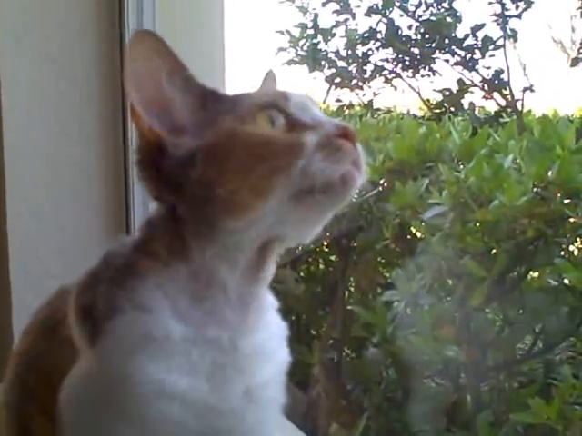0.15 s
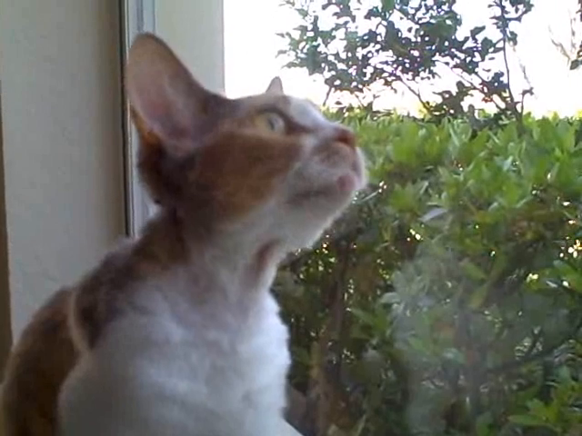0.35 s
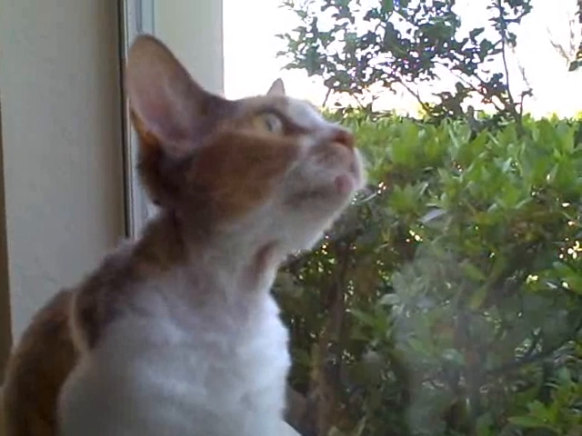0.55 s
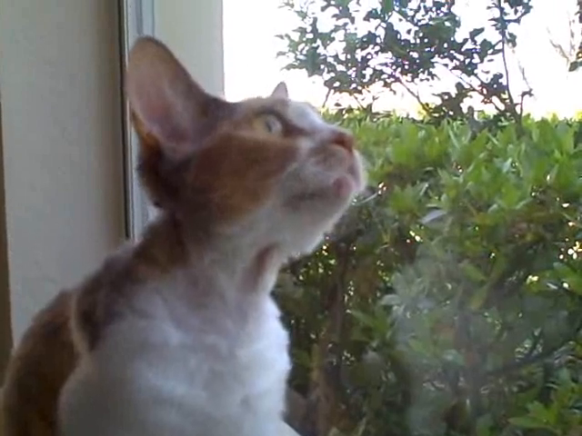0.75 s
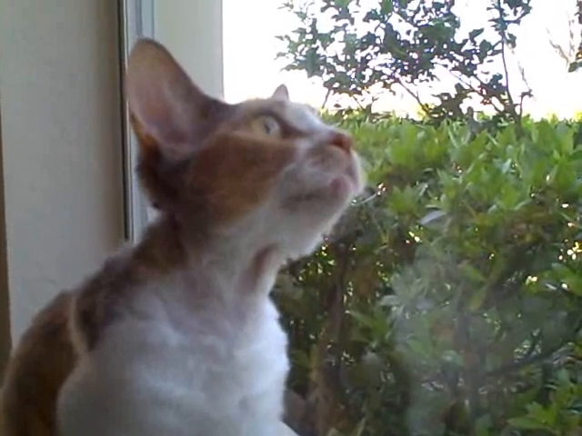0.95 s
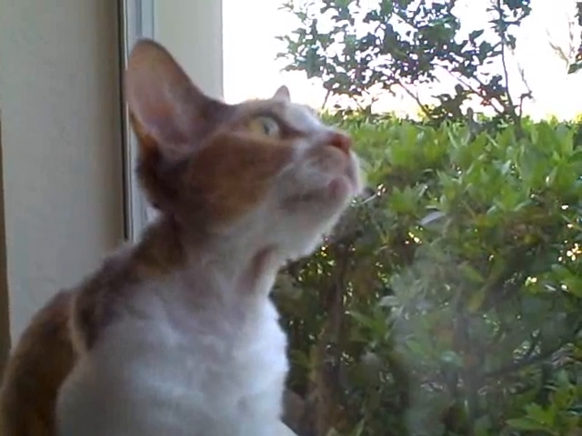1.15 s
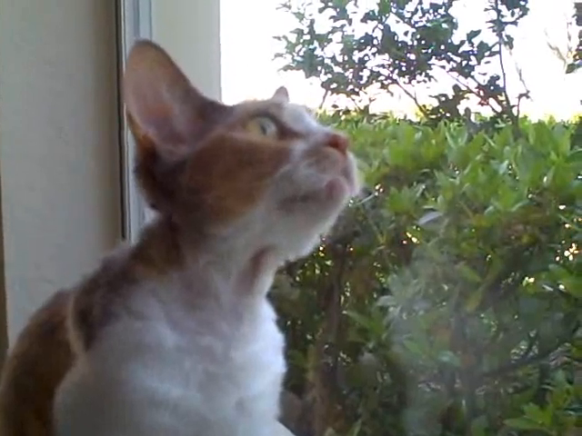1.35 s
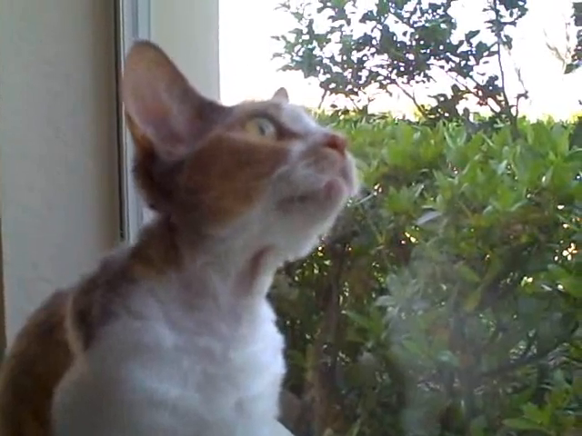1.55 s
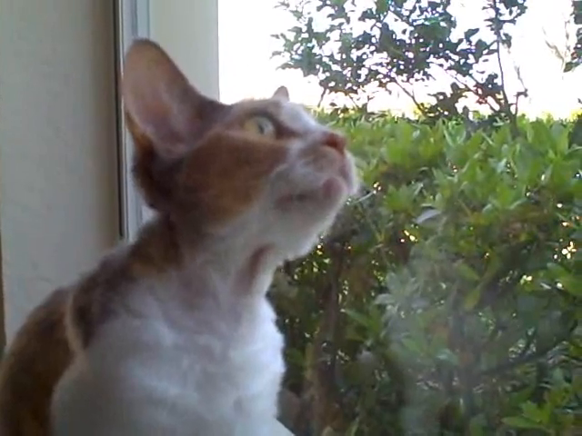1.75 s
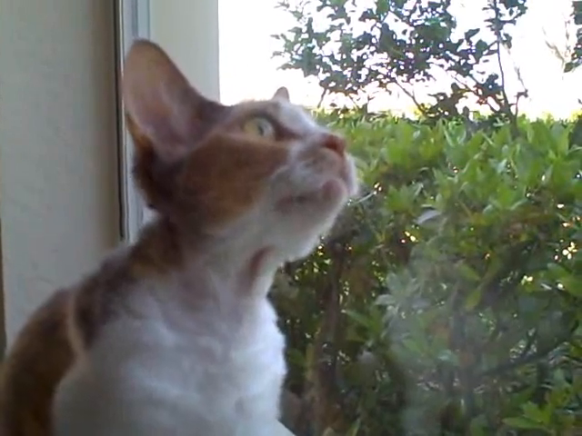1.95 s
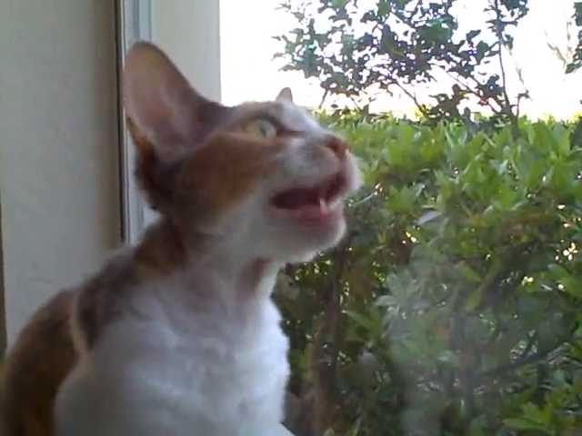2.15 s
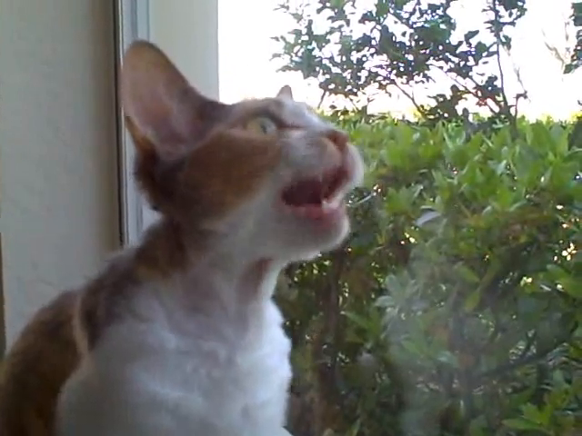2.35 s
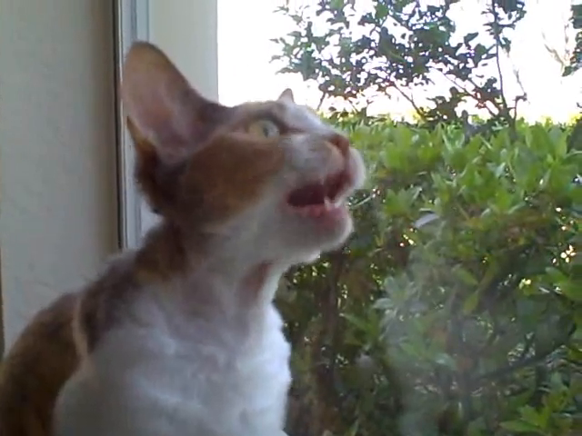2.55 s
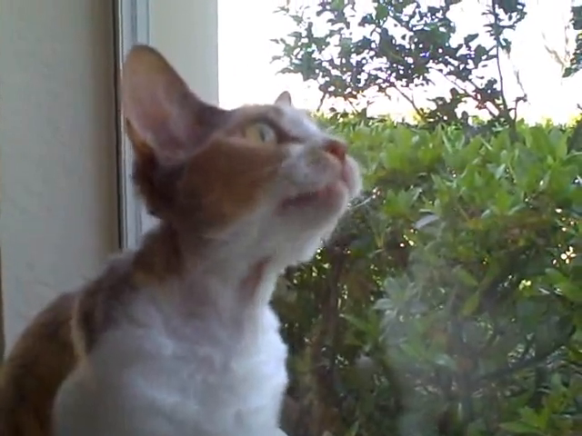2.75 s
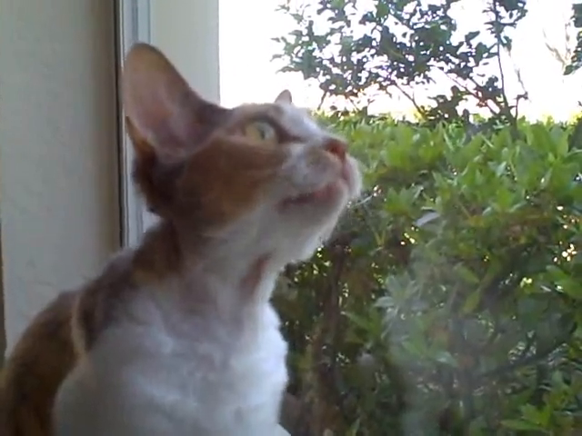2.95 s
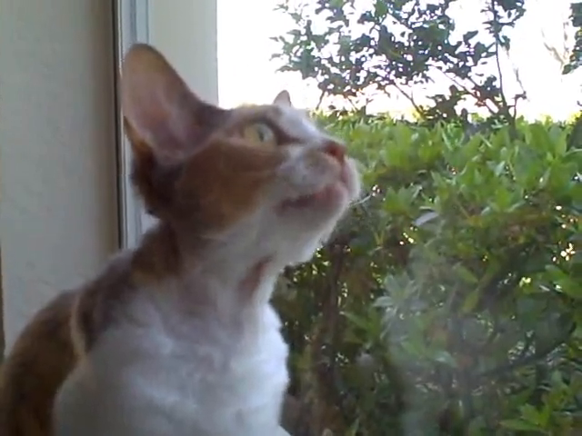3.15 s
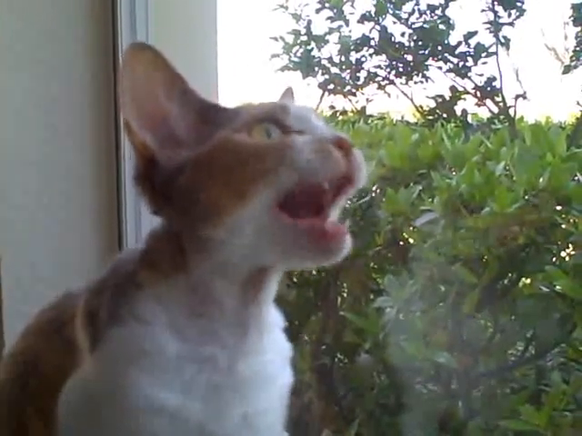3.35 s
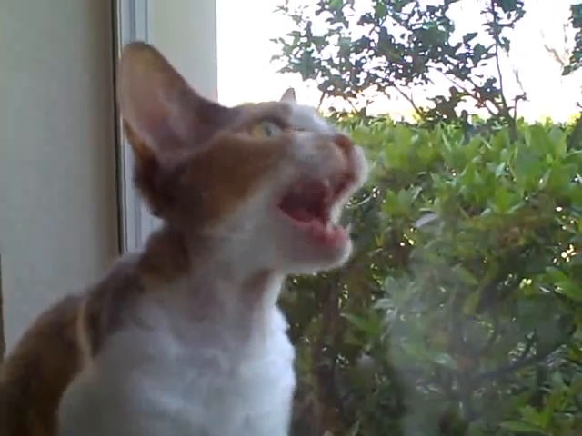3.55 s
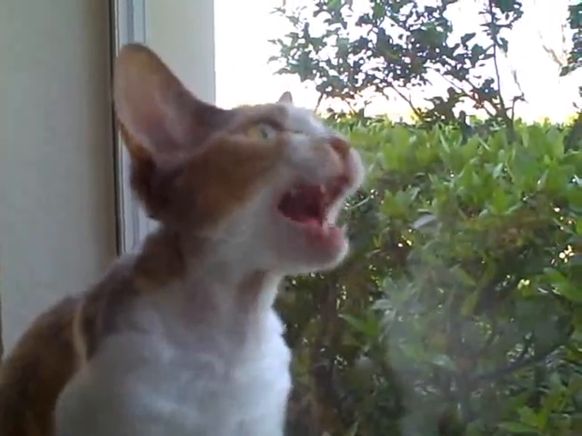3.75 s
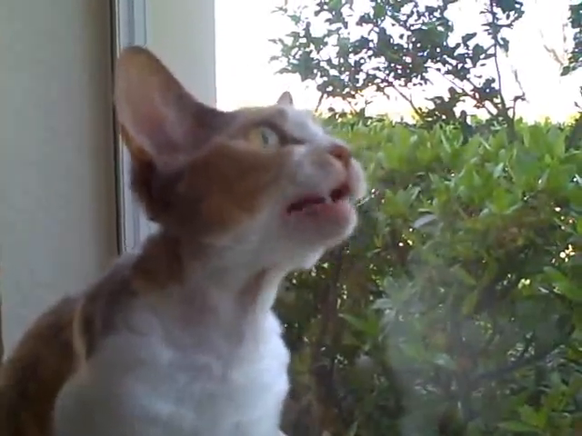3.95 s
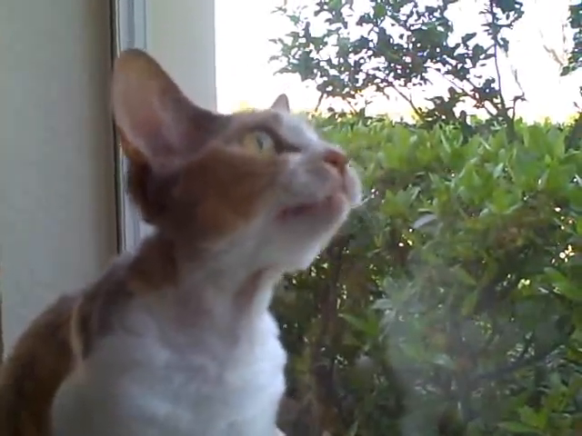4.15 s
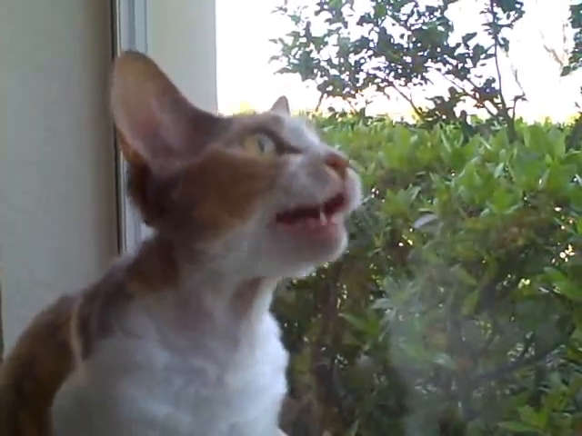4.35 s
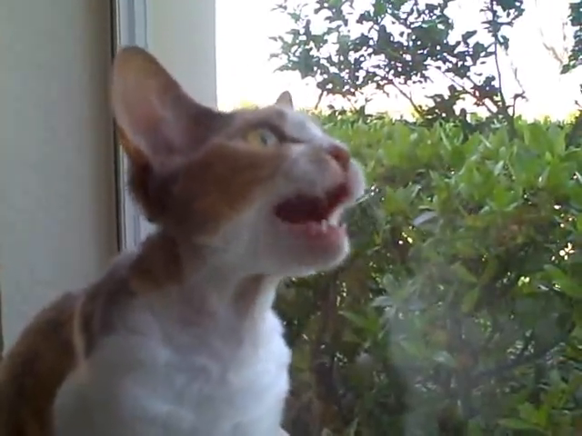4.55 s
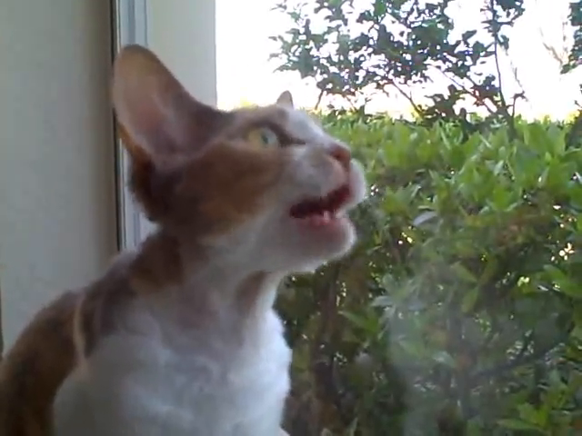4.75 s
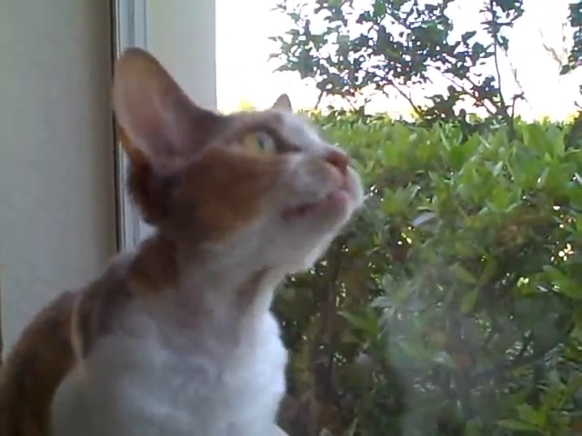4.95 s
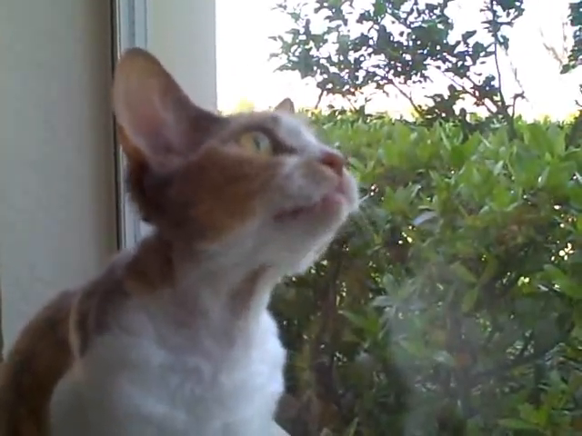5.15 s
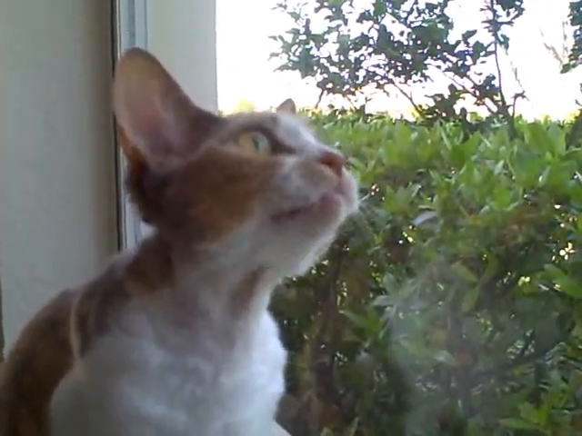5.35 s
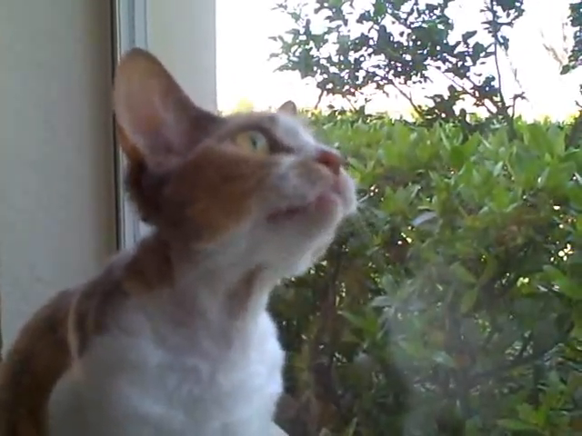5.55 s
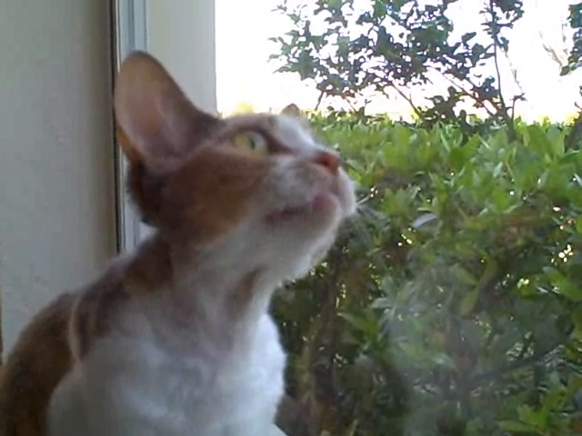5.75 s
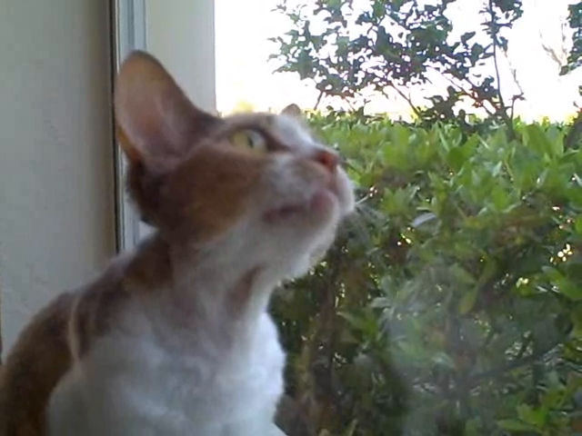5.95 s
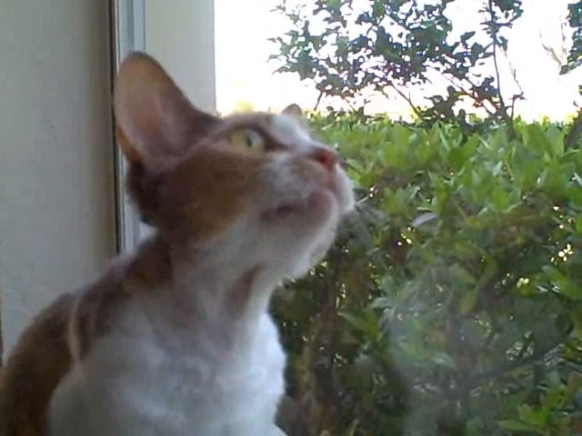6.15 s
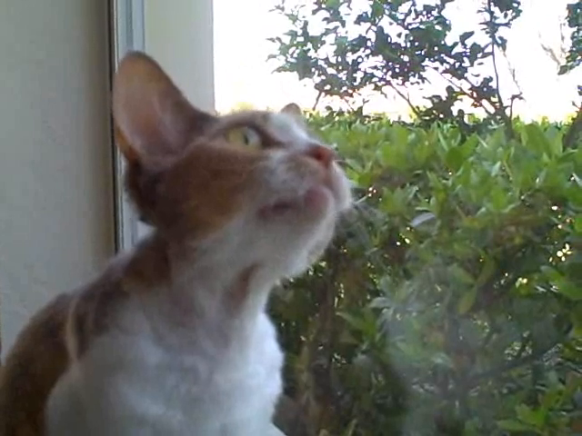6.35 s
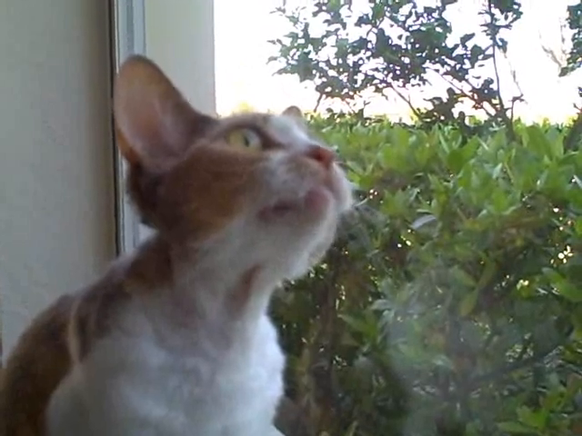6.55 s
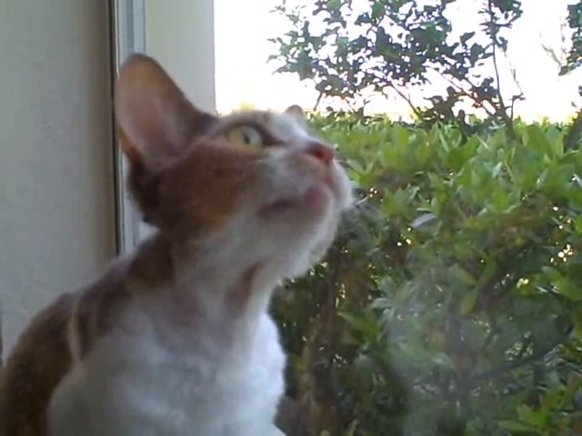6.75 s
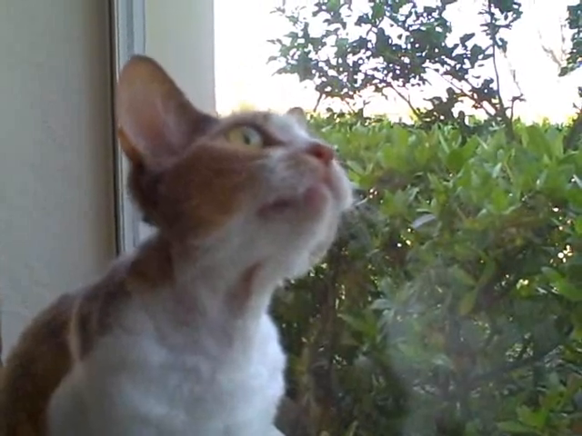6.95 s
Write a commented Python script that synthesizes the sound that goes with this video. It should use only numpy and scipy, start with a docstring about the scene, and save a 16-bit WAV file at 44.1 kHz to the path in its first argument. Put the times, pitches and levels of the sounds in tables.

```python
"""At a window a cat chatters at a bird: wet clicks of lips and tongue and short crackling smacks, close by.
Each click is an impulse into mouth resonances; each smack is a swelling crackle of tiny bursts.
Outside the bird gives two falling, slightly hoarse whistles: gliding sines, octave and rasp, blurred by echoes.
Small birds chirp far off as short rough slides; the room adds rumble, hiss and a faint mains hum.
Coarse 16 kHz sampling mirrors a weaker copy of the treble upward."""
import sys
import numpy as np
from scipy import signal
from scipy.fft import rfft, irfft, next_fast_len
from scipy.io import wavfile

SR = 44100
rng = np.random.default_rng(int(sys.argv[2]) if len(sys.argv) > 2 else 0)


def pcm_store(signal):
    """Save signal as 16-bit PCM."""
    levels = np.round(np.clip(np.atleast_2d(signal), -1, 1) * 32767)
    wavfile.write(sys.argv[1], SR, levels.astype(np.int16).T)


N = 308259
TIME = np.arange(N) / SR
SAMPLING_HZ = 16000  # the coarse sampling; half of it limits the direct sound


def gain_of(db):
    """Decibels to amplitude."""
    return 10 ** (np.asarray(db) / 20)


def evened(x):
    """Scales to rms 1."""
    return x / np.sqrt(np.mean(x ** 2) + 1e-20)


def read(points, hz):
    """A spectrum joined by straight lines over log frequency."""
    f, value = np.transpose(points)
    return np.interp(np.log(hz + 1), np.log(f + 1), value)


def colour(x, points):
    """Filters by a spectrum and cuts everything above half the sampling rate."""
    hz = np.fft.rfftfreq(len(x), 1 / SR)
    in_band = hz < SAMPLING_HZ / 2
    return irfft(rfft(x) * gain_of(read(points, hz)) * in_band, len(x))


def noise(points):
    """Coloured noise of rms 1."""
    white = rng.standard_normal(next_fast_len(N))
    return evened(colour(white, points)[:N])


def wander(rate_hz):
    """Random fluctuation of rms 1, smooth above rate_hz."""
    size = next_fast_len(N)
    hz = np.fft.rfftfreq(size, 1 / SR)
    white = rng.standard_normal(size)
    return evened(irfft(rfft(white) * np.exp(-(hz / rate_hz) ** 2), size)[:N])


def add(mix, s, sound):
    """Mixes a sound in at time s."""
    part = mix[max(round(s * SR), 0):][:len(sound)]
    part += sound[:len(part)]


def echoes(x, t60, build_up_s, size):
    """A cloud of reflections of energy 1 that builds up, then dies by 60 dB per t60 seconds."""
    t = np.arange(size) / SR
    taps = rng.standard_normal(size) * gain_of(-60 * t / t60) * (1 - np.exp(-(t / build_up_s) ** 2))
    return signal.fftconvolve(x, taps / np.linalg.norm(taps))[:N]


def room_tone(floor_db=-50, waver_db=0.5):
    """Low rumble and hiss under a slightly wavering mains hum of steady partials."""
    # spectrum of room tone and microphone hiss: f/Hz, relative level per Hz/dB
    floor = [(12, -38), (20, -2), (65, -2.5), (92, -8.5), (125, -9), (357, -15), (471, -22.5), (508, -22.5),
             (605, -17), (926, -25.5), (2930, -32.5), (3240, -29.5), (3770, -34.5), (5920, -24.5),
             (8000, -34.5), (10400, -68), (17600, -120)]
    # partials of the mains hum: f/Hz, rms level/dB
    partials = [(59.7, -60.5), (120, -67.5), (240, -64.5), (360, -71), (480, -72), (599.5, -67),
                (720, -69.5)]
    drift = 0.28 * wander(2.7)  # rad, shared by all partials
    hum = np.zeros(N)
    for hz, db in partials:
        level = gain_of(db + waver_db * wander(6.6))
        hum += level * np.sin(2 * np.pi * (hz * TIME + rng.random()) + drift)
    return gain_of(floor_db) * noise(floor) + np.sqrt(2) * hum


def far_birds(chirp_hz=2990, length=0.0366, fall=.16, trim_db=1, octave_db=-13,
              harsh=.22, rattle_db=-9, hedge_db=-1, garden_db=-6):
    """Short harsh chirps slide down in pitch, heard only through the smear of the hedge and the walls."""
    # distant chirps: t/s, level before trim, throat and echoes/dB
    chirps = [(0.142, -50), (1.823, -54), (2.595, -50.5), (3.026, -53.5), (3.574, -55), (4.1, -53),
              (4.544, -46.5), (4.741, -47.5), (4.944, -47.5), (5.344, -45.5), (5.698, -52)]
    # throat of the small birds: f/Hz, gain/dB
    throat = [(500, -25), (850, 4.5), (1300, -8), (2100, -5), (2550, 5.5), (2950, 3), (3500, -0.5),
              (4100, -7), (5500, -1), (7000, 6)]
    out = np.zeros(N)
    rough = 1 + harsh * wander(1200)  # fast pitch jitter
    rattle = gain_of(rattle_db) * wander(2200)
    for s, db in chirps:
        u = np.clip((TIME - s) / length, 0, 1)  # progress through the chirp
        pitch = chirp_hz * (1 + fall * (.5 - u)) * rough
        phase = 2 * np.pi * np.cumsum(pitch) / SR
        voice = np.sin(phase) + gain_of(octave_db) * np.sin(2 * phase) + rattle
        out += gain_of(db + trim_db) * np.sin(np.pi * u) * voice
    out = colour(out, throat)
    hedge = echoes(out, t60=0.03, build_up_s=0.00035, size=4096)
    garden = echoes(out, t60=0.7, build_up_s=0.013, size=32768)
    return gain_of(hedge_db) * hedge + gain_of(garden_db) * garden


def bird(waver=0.00535, flutter_db=3.5, buzz_hz=760, buzz=0.13, wall_db=-8, direct_db=-0.7, garden_db=-5.5):
    """A falling whistle whose octave takes over as it turns hoarse; walls blur it and the garden rings on."""
    # whistles: start t/s, length/s, level before the final mix/dB, pitch before drop and sag f/Hz, glide/s
    whistles = [(0.898, 0.247, -44, 3176, .029), (6.167, 0.165, -43.5, 3205, .033)]
    # spectrum of the hoarse breath: f/Hz, relative level per Hz/dB
    hoarse_colour = [(500, -6), (900, -6), (1500, -5), (2350, -1.5), (2800, -3.5), (4000, -5.5), (5200, -7),
                     (6300, 4.5), (7000, -6.5), (8000, -10)]
    drop_hz, sag_hz_per_s = 792, 850  # the pitch swoops down from above, then sags
    lead_s, lead_db = 0.021, -19  # a faint note leads in
    attack_s, release_s = 0.0041, .012
    peak_s = 0.13  # the effort swells until this long after the start, then ebbs
    ebb_db_per_s, octave_ebb_db_per_s = 188, 111  # the second also for the hoarseness
    # level at the peak of effort, and how far it has grown
    octave_db, octave_swell_db = 3, 28
    hoarse_db, hoarse_swell_db = -4, 17.5
    undertone_db = -11  # a side tone below the whistle, relative to the hoarseness

    out = np.zeros(N)
    rasp = noise(hoarse_colour) * gain_of(2.2 * wander(70))
    jitter = 1 + waver * wander(270)
    # a second, rough vibration sets weak side tones around the whistle
    buzzing = 2 * np.pi * np.cumsum(buzz_hz * (1 + 0.12 * wander(315))) / SR
    flutter = gain_of(flutter_db * wander(98)) * (1 + buzz * np.sin(buzzing))
    for start, length, db, base_hz, glide in whistles:
        t = TIME - start
        age = np.clip(t, 0, length)
        pitch = base_hz + drop_hz * np.exp(-(age / glide) ** 1.36) - sag_hz_per_s * age
        phase = 2 * np.pi * np.cumsum(pitch * jitter) / SR
        lead_in = gain_of(lead_db) * np.clip((t + lead_s) / attack_s, 0, 1) * (t < attack_s)
        onset = np.clip(t / attack_s, 0, 1) + lead_in
        release = np.clip((length - t) / release_s, 0, 1)
        gate = gain_of(db) * onset * release

        slack = np.maximum(1 - age / peak_s, 0) ** 1.73  # effort still missing
        ebb = np.maximum(age - peak_s, 0)  # s since the peak
        first = gain_of(-ebb_db_per_s * ebb)
        octave = gain_of(octave_db - octave_swell_db * slack - octave_ebb_db_per_s * ebb)
        hoarse = gain_of(hoarse_db - hoarse_swell_db * slack - octave_ebb_db_per_s * ebb)
        undertone = hoarse * gain_of(undertone_db) * np.sin(phase - buzzing)
        tones = first * np.sin(phase) + octave * np.sin(2 * phase) + undertone
        out += gate * (np.sqrt(2) * flutter * tones + hoarse * rasp)
    walls = echoes(out, t60=0.12, build_up_s=0.0036, size=4096)
    garden = echoes(out, t60=0.69, build_up_s=0.009, size=44100)
    return gain_of(direct_db) * out + gain_of(wall_db) * walls + gain_of(garden_db) * garden


def clicks(mouth_width_hz=800, hollow_hz=1900, hollow_width_hz=800, pop_hz=750, pop_width_hz=550,
           trim_db=0.25, count=3):
    """Each parting of wet lips is one impulse into three broad resonances of the mouth; small ticks follow."""
    # mouth clicks: t/s, level over 2 ms before trim/dB, mouth resonance f/Hz,
    # low pop relative level/dB, first after-tick relative level/dB
    click_table = [(2.1381, -47.5, 6470, -20, -20), (2.234, -34, 6600, -21, -14),
                   (2.2829, -42.5, 6550, -21, -20), (2.2942, -43, 6210, -29, -20),
                   (2.4315, -19.5, 5460, -7.5, -35), (2.492, -42, 4800, -22, -20),
                   (2.6265, -21, 5600, -9.5, -30), (2.6463, -38, 5760, -17, -20),
                   (3.3398, -33, 5860, -26, -5), (3.4004, -34, 6900, -19, -4),
                   (3.4143, -28, 5460, -14, -15), (3.4314, -34.5, 5250, -16, -6.5),
                   (3.4987, -38.5, 5200, -20, -15), (3.5513, -40, 5350, -16, 0),
                   (3.6109, -45, 4850, -11, -22), (3.6602, -23, 5500, -20.5, -17),
                   (3.669, -31, 5300, -31, -14), (3.7121, -32, 5270, -33, -20),
                   (3.714, -21.5, 5220, -24.5, -9.5), (3.8551, -44, 4960, -25, -20),
                   (3.9029, -45, 5350, -17, -20), (3.9246, -25.5, 5590, -21, -16),
                   (3.9703, -31.5, 5130, -18, -7), (4.2749, -43, 5080, -26, -22),
                   (4.4159, -41, 6400, -16, -20), (4.4315, -44.5, 6500, -16, -20),
                   (4.567, -30, 5080, -21, -26), (4.6141, -36.5, 5370, -21, -16),
                   (4.6626, -39, 5150, -14, -9), (4.7291, -31.5, 5050, -25, -15),
                   (4.7852, -31, 5200, -14, -14), (5.144, -45, 5370, -21, -20)]
    after_gap_s, after_fade_db = .003, -7  # sticky lips tick again: mean gap, each tick weaker
    hollow_base_db, hollow_per_pop = -6, 0.37  # the hollow of the cheeks rings more in a deep pop
    out = np.zeros(N)
    hz = abs(np.fft.fftfreq(512, 1 / SR))
    span = .002 * SR  # samples over which the level counts
    gaps = after_gap_s * (.5 + rng.random((len(click_table), count)))
    delays = np.cumsum(gaps, axis=1)
    for (s, db, mouth_hz, pop_db, after_db), later in zip(click_table, delays):
        hollow_db = hollow_base_db + hollow_per_pop * pop_db
        modes = [(mouth_hz, mouth_width_hz, 0),
                 (hollow_hz, hollow_width_hz, hollow_db),
                 (pop_hz, pop_width_hz, pop_db)]
        power = 0
        for f, width, mode_db in modes:
            resonance = evened(1 / (1 + ((hz - f) / width) ** 2))
            power = power + (gain_of(mode_db) * resonance) ** 2
        # minimum phase: a sharp front and a short ring
        spectrum = np.exp(signal.hilbert(.5 * np.log(power)).conj())
        pulse = gain_of(db + trim_db) * np.sqrt(span) * np.fft.ifft(spectrum).real
        add(out, s, pulse)
        for k, delay in enumerate(later):
            add(out, s + delay, gain_of(after_db + k * after_fade_db) * pulse)
    return out


def smacks(bursts_per_s=5200, spread_db=1.5, mouth_width_hz=360, mouth_db=5, size=16384):
    """Films of saliva burst in a dense crackle that swells and dies, coloured by the mouth."""
    # wet smacks as the tongue peels away: t of the peak/s, level/dB, rise/s, decay/s, mouth resonance f/Hz
    smack_table = [(2.663, -24.5, .0071, 0.015, 6070), (3.436, -43.5, 0.0039, 0.01, 5170),
                   (3.564, -39, 0.0066, 0.0075, 5260), (3.663, -31, 0.0022, .0045, 5570),
                   (3.719, -28.5, 0.0043, 0.0086, 5500), (3.921, -28.5, .0088, 0.006, 5740),
                   (3.98, -48, 0.0046, .019, 5000), (4.04, -49, .016, 0.025, 5200),
                   (4.676, -41, .006, 0.0043, 5100), (4.799, -35.5, 0.0086, 0.02, 5600),
                   (4.845, -44, .008, 0.027, 5460), (4.933, -52.5, 0.012, 0.035, 4860)]
    # spectrum of the bursting films: f/Hz, relative level per Hz/dB
    film_colour = [(200, -5.5), (700, -13), (1800, -6.5), (2600, -5.5), (3400, -9.5), (4500, -6),
                   (5500, -3.5), (6400, 0.5), (7200, -5), (8000, -20)]
    out = np.zeros(N)
    hz = np.fft.rfftfreq(size, 1 / SR)
    t = (np.arange(size) - size // 4) / SR  # 0 at the peak
    for s, db, rise, decay, mouth_hz in smack_table:
        strength = gain_of(spread_db * np.minimum(rng.exponential(1, size), 3))
        bursts = strength * rng.choice([-1, 1], size)
        bursts *= rng.random(size) < bursts_per_s / SR
        mouth = 1 + gain_of(mouth_db) / (1 + 1j * (hz - mouth_hz) / mouth_width_hz)
        crackle = evened(colour(irfft(rfft(bursts) * mouth), film_colour))
        swell = np.exp(-np.where(t < 0, (t / rise) ** 2, t / decay))
        add(out, s + t[0], gain_of(db) * swell * crackle)
    return out


def cat(sill_db=-10, room_db=-16):
    """The mouth, with quick reflections from pane and sill and a faint room tail."""
    mouth = clicks() + smacks()
    sill = echoes(mouth, t60=0.013, build_up_s=0.0024, size=2048)
    room = echoes(mouth, t60=0.32, build_up_s=0.0018, size=16384)
    return mouth + gain_of(sill_db) * sill + gain_of(room_db) * room


def scene():
    """Room, birds and cat at one microphone."""
    return (room_tone() + far_birds() + bird() + cat())[None]


def record(dry, edge_hz=15700):
    """Coarse sampling folds a weaker copy of the sound above 8 kHz; then the band limit at edge_hz."""
    # strength of the mirror image by source frequency: f/Hz, gain/dB
    mirror = [(300, -38), (500, -30), (900, -14.5), (2000, -8), (2500, -6), (3000, -11.5), (4000, -9),
              (6000, -4), (7500, -0.5)]
    in_band = np.fft.rfftfreq(N, 1 / SR) < SAMPLING_HZ / 2
    heard = irfft(rfft(dry[0]) * in_band, N)
    # each f returns at 16 kHz - f; the copy at 16 kHz + f falls to the band limit
    image = 2 * np.cos(2 * np.pi * SAMPLING_HZ * TIME) * colour(heard, mirror)
    band_limit = signal.firwin(511, edge_hz, window=("kaiser", 9), fs=SR)
    return signal.fftconvolve(heard + image, band_limit, "same")[None]


dry = scene()
out = record(dry)
pcm_store(out)
```